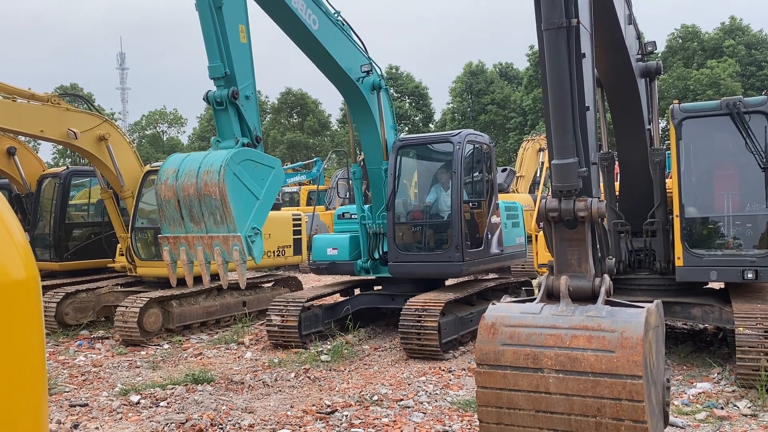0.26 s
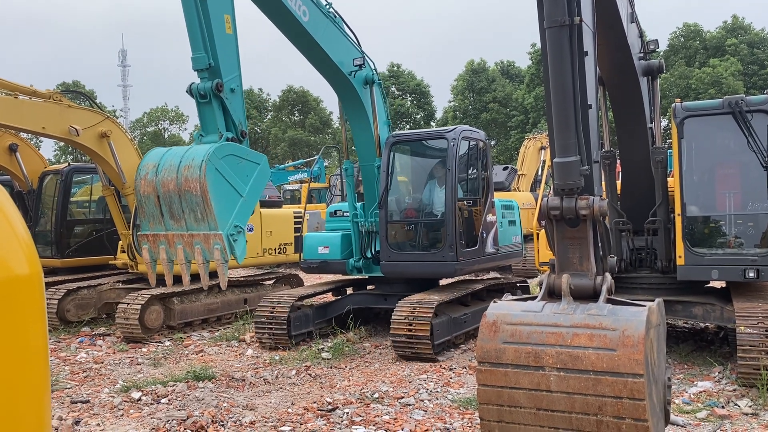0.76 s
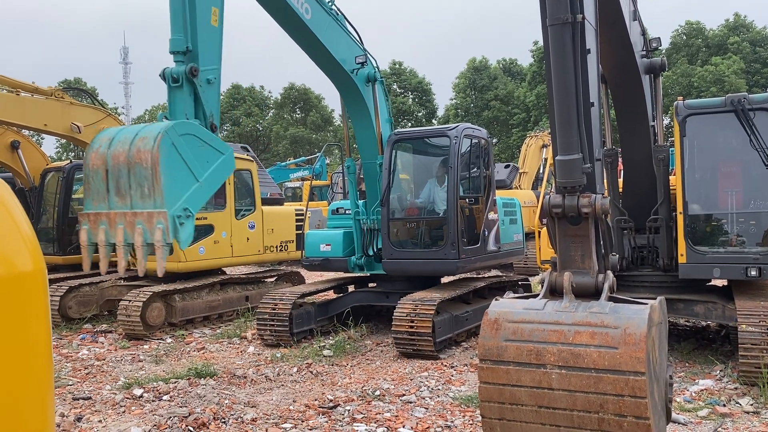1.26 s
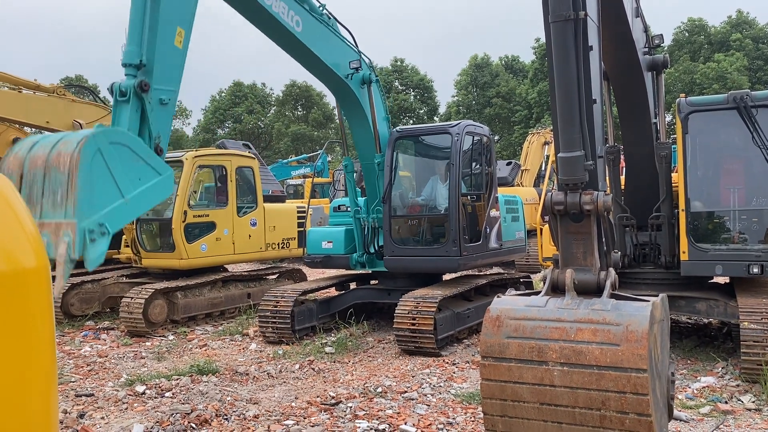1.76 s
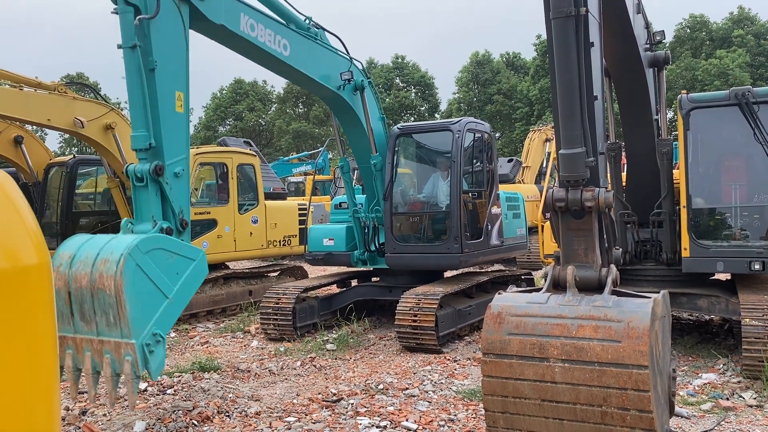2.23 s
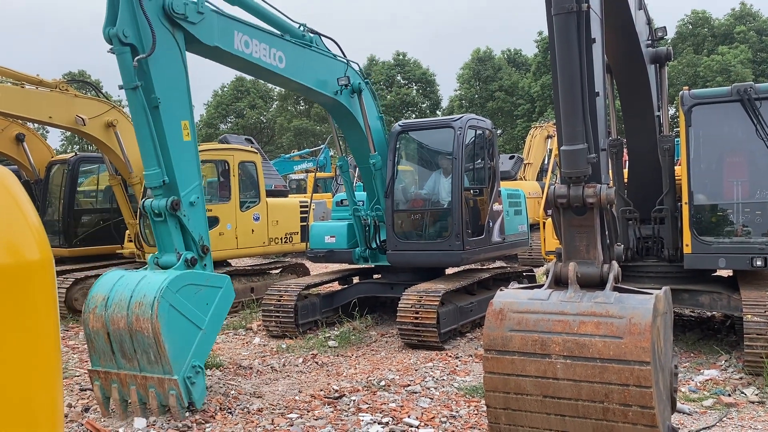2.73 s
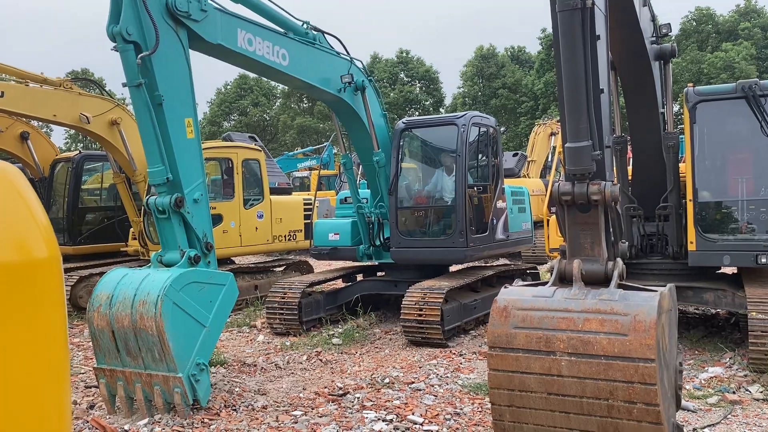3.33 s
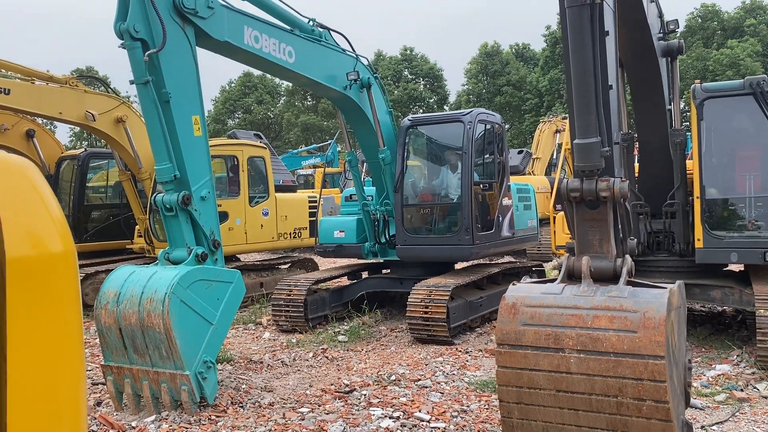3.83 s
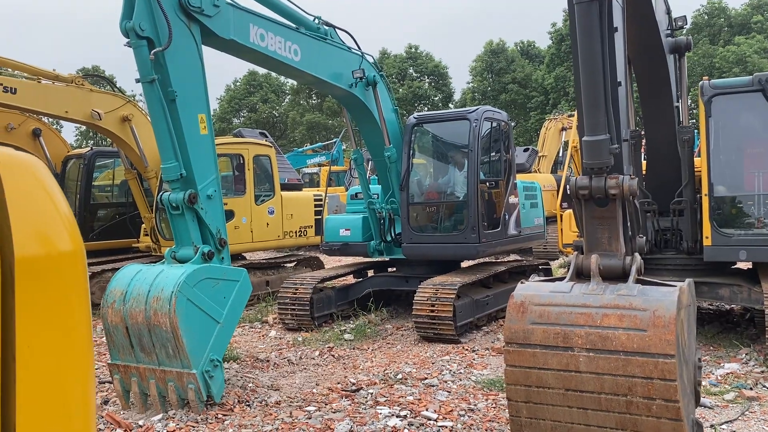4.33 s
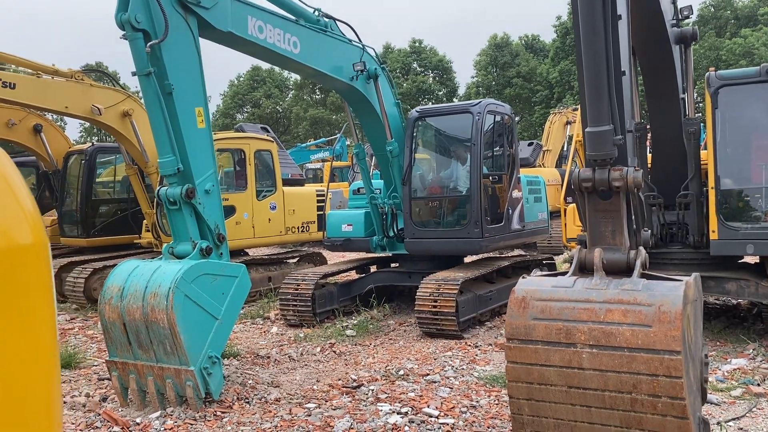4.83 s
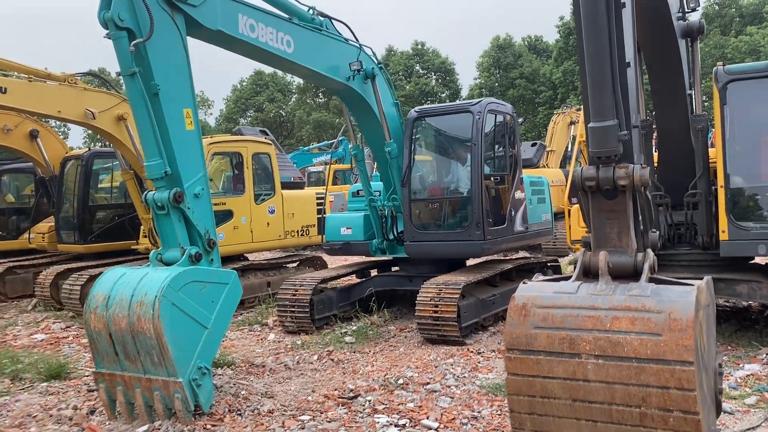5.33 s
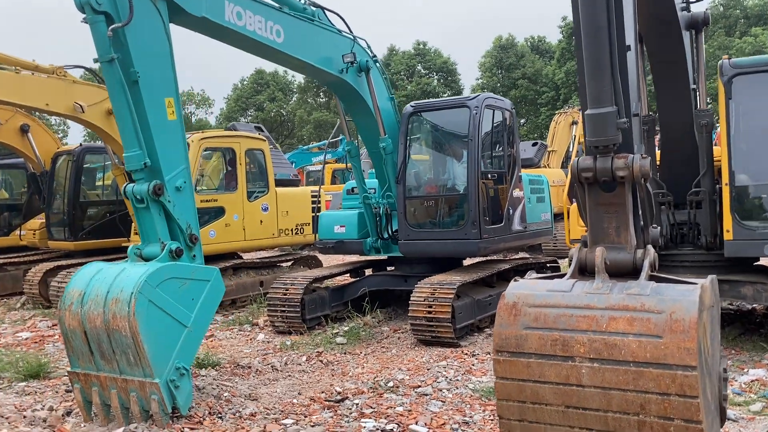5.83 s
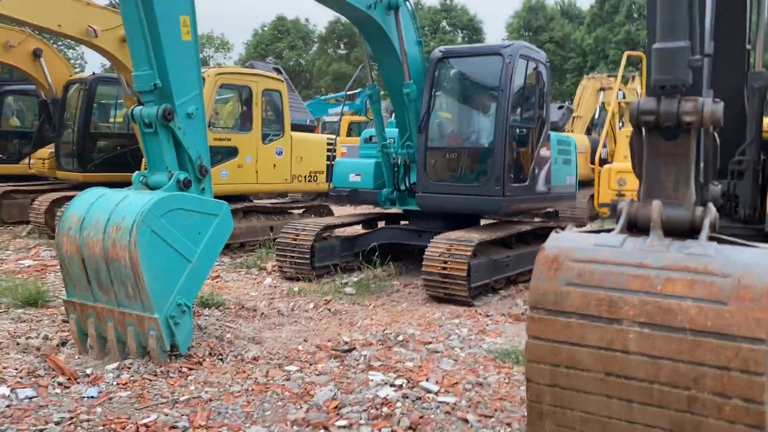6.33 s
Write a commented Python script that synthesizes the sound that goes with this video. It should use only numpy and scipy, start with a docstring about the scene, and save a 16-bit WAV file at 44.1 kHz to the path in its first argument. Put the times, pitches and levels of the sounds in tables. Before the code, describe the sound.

A steady, rough four-cylinder diesel roar fills an open yard. Heavy metallic bangs come in uneven clusters, densest around a second and a half, with short pin squeaks, clinks and brief echoes off parked machines. A sharp pebble crack sounds among the last blows. The engine then drones alone, winds down quickly, and thins to a quiet far wash with a handling tap near the end.

```python
"""An engine roars and sings over hard steel knocks in an open yard, then winds down.
It is a four-cylinder diesel excavator: exhaust, fan and pump are sines locked to the crank, the roar is pulsed noise.
The loose bucket knocks on its pins as the arm swings: bursts of bounces ring decaying modes, with clinks and echoes.
A pebble cracks, far machinery washes behind and a hand taps the camera body.
All is heard through two close microphone ports; near the end a low cut switches in."""
import sys
import numpy as np
from scipy import signal
from scipy.fft import rfft, irfft
from scipy.io import wavfile

SR = 44100
rng = np.random.default_rng(int(sys.argv[2]) if len(sys.argv) > 2 else 0)


def how_loud(loudness_db):
    """Turn decibels into a plain amplitude multiplier (0 dB gives 1, 20 dB gives 10)."""
    steps = np.asarray(loudness_db, float) / 20
    return 10 ** steps


def log_audio(samples):
    """Write samples as a 16-bit WAV file to the path given in sys.argv[1]."""
    # one column per channel
    frames = np.atleast_2d(samples).T
    # limit to full scale, then quantise
    limited = np.clip(frames, -1, 1)
    pcm = np.round(limited * 32767).astype(np.int16)
    wavfile.write(sys.argv[1], SR, pcm)


N = 290178
T = np.arange(N) / SR  # seconds


def evened(x):
    """Normalization: scales to a root mean square of 1."""
    return x / np.sqrt(np.mean(x ** 2) + 1e-20)


def read(points, hz):
    """Log-frequency interpolation of a table of (Hz, value)."""
    f, value = np.transpose(points)
    return np.interp(np.log(hz + 1), np.log(f + 1), value)


def curves(rows):
    """Linear interpolation in time of each column after the first, which holds seconds."""
    s, *columns = np.transpose(rows)
    return [np.interp(T, s, column) for column in columns]


def colour(x, points):
    """Linear filtering: multiplies the spectrum by a table of (Hz, dB)."""
    gain = how_loud(read(points, np.fft.rfftfreq(x.shape[-1], 1 / SR)))
    return irfft(rfft(x) * gain, x.shape[-1])


def resonate(x, hz, width):
    """Simple resonance: two poles with gain 1 at the peak."""
    return signal.lfilter(*signal.iirpeak(hz, hz / width, SR), x)


def wander(hz):
    """Slow random modulation of rms 1: sines of random phase from hz / 8 to hz."""
    f = np.geomspace(hz / 8, hz, num=24)
    coarse = T[::64]
    slow = np.sin(2 * np.pi * (f[:, None] * coarse + rng.random((len(f), 1)))).sum(0)
    return np.interp(T, coarse, evened(slow))


# Speed and exhaust of the engine. Each row: time in seconds, firing rate in Hz,
# exhaust beat at that rate in dB, its octave in dB.
ENGINE_COURSE = [(0.0, 66.5, -18, -40), (0.35, 65.1, -23, -36), (0.6, 67.25, -17, -42),
                 (1.05, 65.85, -16.5, -45), (1.2, 65.12, -23, -34), (1.6, 65.2, -24, -45),
                 (1.8, 66.5, -20, -43), (2.05, 63.63, -20.5, -32), (2.25, 63.5, -26.5, -32),
                 (2.55, 64.95, -25, -35), (2.7, 67.54, -17.5, -32), (3.0, 66.19, -17, -32.5),
                 (4.55, 66.93, -18.5, -34.5), (4.8, 62.3, -15.5, -35), (4.9, 58.7, -20.5, -31),
                 (5.1, 52.56, -29.5, -34.5), (5.25, 49, -28, -31.5), (5.36, 46.43, -32, -34),
                 (5.45, 44.27, -34, -26), (5.6, 40.6, -39, -25)]
# Broadband levels. Each row: time in seconds, engine roar in dB, oil hiss in valves and hoses in dB.
NOISE_COURSE = [(0.0, -31, -44.5), (0.53, -29.5, -42), (1.26, -31.5, -43), (1.55, -25.5, -41),
                (1.9, -27.5, -42.5), (2.11, -32, -35), (2.5, -31, -36), (2.88, -28, -41),
                (3.21, -32.5, -42.5), (4.53, -32, -43), (5.02, -35, -49.5), (5.5, -40, -49.5),
                (5.74, -47.5, -51), (6.01, -51.5, -52.5), (6.58, -45.5, -51.5)]
# Spectrum shape of the oil hiss. Each row: frequency in Hz, relative density in dB per Hz.
HISS_SPECTRUM = [(800, -31), (2200, 8.5), (4200, 0.5), (6000, -3.5), (8500, -5), (11000, -7), (14500, -9),
                 (15700, -13), (16300, -53)]


def engine():
    """Superposition: crank-locked tones, roar of the block and turbulent hiss of the oil."""
    speed_hz, beat_db, octave_db = curves(ENGINE_COURSE)
    turns = np.cumsum(speed_hz) / SR  # firings so far
    roar_db, hiss_db = curves(NOISE_COURSE)
    roar = block(turns)
    mid_band = signal.butter(4, (300, 1500), "band", fs=SR, output="sos")
    mids = signal.sosfilt(mid_band, roar.mean(0))  # the roar level refers to this band
    oil = rng.standard_normal((2, N)) * how_loud(0.5 * wander(24))
    hiss = evened(ports(*colour(oil, HISS_SPECTRUM)))
    fade = how_loud(-300 * np.maximum(T - 5.59, 0))  # the tones die at 300 dB a second
    hum = tones(turns, roar_db, speed_hz, beat_db, octave_db) * fade
    return ports(hum, None) + how_loud(roar_db) * roar / mids.std() + how_loud(hiss_db) * hiss


# Hydraulic pump. Each row: time in seconds, piston tone in dB, its octave in dB.
PUMP_COURSE = [(0, -45, -42), (2.0, -47, -54), (2.1, -30.5, -59), (2.45, -32, -33), (2.7, -54, -40),
               (4.6, -64, -37), (5.0, -58, -62)]
# Thin lines of crank and valve gear. Each row: cycles per firing, level against the roar setting in dB.
CRANK_LINES = [(2.196, -10.5), (2.99, -7), (1.725, -18), (2.526, -22), (5.507, -15.5), (7.05, -16),
               (8.88, -12), (9.54, -17), (10.2, -13), (11.27, -15), (11.59, -24), (12.68, -15.5),
               (13.02, -18), (20.61, -17)]
FAN_RATIO = 2.71  # blade passes per firing
FAN_DB, FAN_FULL_HZ = -27, 66.5  # blade tone at working speed, and that speed in firings per second
FAN_LOSS_DB = .035  # per square Hz of departure from working speed
FAN_WAVER_DB = 1.5  # rms


def tones(turns, roar_db, speed_hz, beat_db, octave_db):
    """Order tracking: exhaust, belt-driven fan and pump pistons sound at fixed multiples of the firing rate."""
    pump_db, pump_octave_db = curves(PUMP_COURSE)
    fan_db = FAN_DB - FAN_LOSS_DB * (speed_hz - FAN_FULL_HZ) ** 2
    # the fourth multiple meets a pipe resonance at 178 Hz while winding down
    pipe_db = -14 + 13 / (1 + ((4 * speed_hz - 178) / 25) ** 2)
    # each line: cycles per firing, level in dB, rms waver in dB
    lines = [(1, beat_db, .8), (2, octave_db, 3.5), (4, octave_db + pipe_db, 1.5),
             (FAN_RATIO, fan_db, FAN_WAVER_DB), (FAN_RATIO / 2, fan_db - 5.0, FAN_WAVER_DB),
             (4.5, pump_db, 1.2), (9, pump_octave_db, 2.5)]
    lines += [(ratio, roar_db + db, 1.8) for ratio, db in CRANK_LINES]
    total = np.zeros(N)
    for ratio, db, waver_db in lines:
        level = np.sqrt(2) * how_loud(db + waver_db * wander(20))
        total += level * np.sin(2 * np.pi * (ratio * turns + rng.random()))
    return total


# The cylinders in firing order. Each row: relative mean strength in dB.
CYLINDER_STRENGTH = [-5, -2.5, -7, -2]
# Panel resonances of the hood. Each row: frequency in Hz, width in Hz, relative level in dB.
HOOD_MODES = [(612, 12.7, 0), (766.5, 30, 0.5), (499, 17, -12), (1380, 150, -6.5)]
# Spectrum shape of the roar. Each row: frequency in Hz, relative density in dB per Hz.
ROAR_SPECTRUM = [(25, -40), (45, -14), (70, -1), (115, -10), (190, -2), (300, -8.5), (400, -15), (600, -13),
                 (950, -20.5), (2000, -25), (4200, -31), (7900, -41), (11000, -48), (16000, -63)]


def block(turns):
    """Periodic excitation: firings knock and puff noise; unequal cylinders give lines a quarter beat apart."""
    count = np.floor(turns).astype(int)
    luck_db = 1.7 * rng.standard_normal(count[-1] + 1)[count]  # one draw per firing
    size = how_loud(np.take(CYLINDER_STRENGTH, count % len(CYLINDER_STRENGTH)) + luck_db)
    blows = evened(size * (np.diff(count, prepend=0) > 0))
    puff = 1 + .2 * np.exp(-(turns % 1) / .4)
    gate = size ** .25 * puff * how_loud(.6 * wander(8))
    pair = []
    for _ in "LR":
        dry_roar = 0.19 * blows + evened(gate * rng.standard_normal(N))
        panels = sum(how_loud(db + 5) * resonate(dry_roar, hz, width) for hz, width, db in HOOD_MODES)
        pair.append(dry_roar + panels)
    return ports(*colour(np.array(pair), ROAR_SPECTRUM))


# Bucket knocks. Each row: start in seconds, level in dB, boom under 400 Hz in relative dB,
# edge over 2.5 kHz in relative dB, frequency in Hz of the plate that is lifted most.
KNOCK_EVENTS = [(0.262, -29, 0, -8, 1380), (0.382, -25.5, -1, -17, 2450), (0.471, -22, -23, -5, 1500),
                (0.59, -22.5, 11, -16, 931), (0.659, -23, 6, -4.5, 2130), (0.959, -15.5, -11, -13.5, 1210),
                (1.212, -23.5, -3.5, -28, 904), (1.319, -20, 3.5, -13, 1193), (1.445, -25.5, -9, -17, 1380),
                (1.535, -14, -0.5, -7.5, 1297), (1.576, -15, -15, -16, 1293), (1.604, -17.5, -2, -20, 950),
                (1.629, -15.5, 7, -11, 254), (1.712, -13.5, 1, -15, 700), (1.739, -17, 1, -7, 2876),
                (1.762, -16.5, 2, -9, 1360), (1.816, -11.5, -6, -10, 1060), (1.914, -23, -1, -3, 1210),
                (1.969, -28, 4, -15, 1129), (2.484, -17, -25, -9, 1900), (2.652, -17, 1, -8.5, 700),
                (2.689, -21, 10, -1, 254), (2.815, -15, -4, -6, 1489), (2.869, -18.5, 3.5, -13, 930),
                (2.914, -25, -4, -19, 948), (3.093, -17, -8.5, -9.5, 1367), (3.145, -18, -8.5, -11, 790),
                (3.191, -26, 1, -4, 1490), (4.527, -35.5, -3, 9, 1600), (6.323, -40.5, -9, -7, 977)]
# Modes of bucket and arm. Each row: frequency in Hz, relative level in dB, time to fall 60 dB in seconds.
BUCKET_MODES = [(106, -7.5, 0.16), (253, 3.5, 0.35), (297.4, -11.5, 0.28), (375, -13.5, 0.22),
                (494.5, -13.5, 0.63), (659, -7, 0.14), (722, 0, 0.076), (791.7, 7, 0.04),
                (873, -20.5, 0.11), (931, -6.5, 0.086), (1260, -4.5, 0.12), (1341, -3, 0.035),
                (1498, -12, 0.15), (1553, -19, 0.098), (1900, -11, 0.048), (2102, -10.5, 0.071),
                (2233, -12.5, 0.15), (2313, -20, 0.13), (2517, 3.5, 0.052), (2695, -3, 0.2),
                (2990, -25, .06), (3200, -23, .06), (3650, -3, .04)]
RATTLE_T60_S, BOUNCES_PER_S, CONTACT_S = 0.072, 220, .0015  # fall, mean rate, onset ramp
PLATE_DB, LUCK_DB = 12, 2.2  # lift of the struck plate's modes, chance spread of all modes


def knocks():
    """Modal synthesis: each blow chatters in the pin play and rings the modes, favouring the struck plate."""
    out, t = np.zeros(N + SR), T[:SR // 2]
    hz, level_db, ring_t60 = np.transpose(BUCKET_MODES)
    modes = how_loud(-60 * t / ring_t60[:, None]) * np.sin(2 * np.pi * hz[:, None] * t)
    for s, db, boom_db, edge_db, plate_hz in KNOCK_EVENTS:
        noise, luck = rng.standard_normal(len(t)), rng.random(len(t))
        fall = how_loud(-60 * t / RATTLE_T60_S)
        bounces = np.sign(noise) * (luck < BOUNCES_PER_S / SR)
        chatter = fall * (bounces + 1.65 * (t == 0))  # the first contact is strongest
        struck_db = PLATE_DB * np.exp(-(np.log(hz / plate_hz) / 0.064) ** 2)
        struck_db = struck_db + LUCK_DB * rng.standard_normal(len(hz))
        ring = how_loud(level_db + struck_db + boom_db * (hz < 400) + edge_db * (hz > 2500)) @ modes
        crunch = colour(noise * fall * np.minimum(t / 0.0066, 1),
                        [(150, -15), (300, boom_db), (800, -5.5), (2200, -8.0),
                         (3500, edge_db - 7.5), (9000, edge_db - 32)])
        blow = evened(signal.oaconvolve(chatter, ring)[:len(t)]) + 0.59 * evened(crunch)
        blow = blow / np.sqrt(np.mean(blow[:900] ** 2))  # level set by the first 20 ms
        at = round(s * SR)
        out[at:at + len(t)] += how_loud(db) * np.minimum(t / CONTACT_S, 1) * blow
    return out[:N]


# Pin clinks. Each row: start in seconds, level in dB, ring in Hz, time to fall 60 dB in seconds.
CLINK_EVENTS = [(.165, -23, 3750, 0.24), (.411, -24, 7330, .06), (.473, -28, 3180, .09),
                (.961, -23, 4190, 0.06), (1.628, -24, 4110, .05), (1.739, -13.5, 2990, 0.042),
                (2.453, -19.5, 4100, 0.078), (2.662, -27, 3200, .085), (2.888, -24, 5643, 0.1)]
# Pin scrapes. Each row: start in seconds, level of the rub in dB, length before the decay in seconds.
SCRAPE_EVENTS = [(0.148, -32.5, .04), (0.375, -32.5, 0.013), (0.414, -41, .014), (.961, -41.5, 0.026),
                 (1.819, -41, .026), (1.928, -47, .017), (2.453, -46, .01), (2.662, -48, .02),
                 (2.887, -38, .002)]
# Spectrum shape of the rub. Each row: frequency in Hz, relative level in dB.
SCRAPE_SPECTRUM = [(1800, -21), (2700, -2.5), (5500, -8), (7200, -3), (9000, -4.5), (11500, -3.5),
                   (16000, -20)]
# Pin modes excited by the rub. Each row: frequency in Hz, width in Hz, gain in dB.
PIN_MODES = [(2410, 98, 18), (2740, 51, 11), (4100, 110, 12.5), (5020, 290, 11.5), (6860, 530, 1.5),
             (8000, 480, -10)]


def clinks():
    """Impact and friction: struck pins ring at one high mode each, rubbed pins pass noise through resonances."""
    rings, scrapes, t = np.zeros(N), np.zeros(N), T[:SR // 2]
    for s, db, hz, t60 in CLINK_EVENTS:
        at = round(s * SR)
        envelope = how_loud(db - 60 * t / t60) * np.minimum(t / 0.00039, 1)
        rings[at:at + len(t)] += envelope * np.sin(2 * np.pi * hz * t)
    for s, db, length in SCRAPE_EVENTS:
        at = round(s * SR)
        held = how_loud(db - 60 * np.maximum(t - length, 0) / 0.13)
        scrapes[at:at + len(t)] += held * np.minimum(t / 0.0003, 1)
    rub = scrapes * evened(colour(rng.standard_normal(N), SCRAPE_SPECTRUM))
    return rings + rub + sum(how_loud(db) * resonate(rub, hz, width) for hz, width, db in PIN_MODES)


def echoes(x):
    """Sparse reflection: parked machines return taps of random sign, the high treble dying first."""
    t = T[:SR // 2]
    shape = (2, len(t))
    signs = rng.choice([-1., 1.], shape)
    taps = signs * (rng.random(shape) < .05) * (t > .008)
    hz, frame_s, z = signal.stft(taps, SR, nperseg=256)
    t60 = read([(250, 0.23), (1000, 0.33), (6000, 0.082)], hz)
    tail = signal.istft(z * how_loud(-60 * frame_s / t60[:, None]), SR, nperseg=256)[1]
    return signal.oaconvolve(x[None], tail / np.linalg.norm(tail[0]), axes=1)[:, :N]


# Spectrum shape of a pebble's crack on steel. Each row: frequency in Hz, relative level in dB.
SNAP_SPECTRUM = [(3000, -27), (4800, 11), (6000, 17), (8000, -35), (11500, 7.5), (16000, -22)]
SNAP_S, SNAP_DB, SNAP_DECAY_S = 2.886, -8, .001  # start, peak level, decay of the burst to 1/e


def snap():
    """Impulsive excitation: a pebble cracks on steel, one brief decaying burst of coloured noise."""
    since = T - SNAP_S
    burst = rng.standard_normal(N) * (since > 0) * np.exp(-np.maximum(since, 0) / SNAP_DECAY_S)
    crack = colour(burst, SNAP_SPECTRUM)
    return how_loud(SNAP_DB) * crack / abs(crack).max()


# Taps of the hand on the camera body. Each row: time in seconds, peak in dB averaged over the two ports.
BODY_TAPS = [(6.4174, -31), (6.4207, -16)]


def bump():
    """Structure-borne sound: two quick round pulses through the camera body, stronger on the right."""
    pulses = sum(how_loud(db) * np.exp(-.5 * ((T - s) / 0.00033) ** 2) for s, db in BODY_TAPS)
    return pulses * how_loud([[-2.5], [2.5]])


# Spectrum shape of far machinery. Each row: frequency in Hz, relative density in dB per Hz.
YARD_SPECTRUM = [(100, -30), (250, -17), (760, 9.5), (1000, -2), (1300, 3), (3300, -8.5), (4200, 0.5),
                 (5700, -11.5), (9000, -18.5), (16000, -33)]
YARD_DB = -47  # mean level


def yard():
    """Diffuse field: far machinery blends into a smooth noise wash with a slow swell."""
    wash = ports(*colour(rng.standard_normal((2, N)), YARD_SPECTRUM))
    return how_loud(YARD_DB + 0.84 * wander(5)) * evened(wash)


# Phase between the ports. Each row: frequency in Hz, phase in radians.
PORT_PHASE = [(60, 0.28), (200, .41), (380, 0.7), (700, 1.01), (1300, 1.3), (2400, 1.25), (4400, 1.05),
              (5500, 1.63), (6300, 1.15), (7000, 0)]
# Coherence of the ports' difference. Each row: frequency in Hz, share in step with the sum from -1 to 1.
PORT_COHERENCE = [(60, -.95), (350, -.8), (550, .7), (1000, .55), (3000, .4), (4000, 0), (5300, -.3),
                  (6500, 0), (7200, .75)]
# Balance of the ports. Each row: frequency in Hz, left over right in dB.
PORT_BALANCE = [(60, 0), (110, 0.0), (200, 0.68), (380, -1), (700, -3), (1290, 0.1), (2380, 1), (4400, 2.5),
                (8120, -1), (15000, 1.8)]
# Comb of the ports. A single row: lower edge in Hz, upper edge in Hz, spacing of half-cycle turns in Hz.
PORT_COMB = (7000, 15000, 2000)


def ports(x, diffuse, aside=0.):
    """Interaural-style phase and coherence: two close ports as a sum and a partly unrelated difference."""
    hz = np.fft.rfftfreq(N, 1 / SR)
    low_hz, high_hz, turn_hz = PORT_COMB
    across = aside * np.exp(-np.log(hz / 1800 + 1e-9) ** 2)  # a source off to one side: more phase in the mids
    lead = read(PORT_PHASE, hz) + across - np.pi * (np.clip(hz, low_hz, high_hz) - low_hz) / turn_hz
    alike = np.clip(read(PORT_COHERENCE, hz), -1, 1)
    tilt = how_loud(read(PORT_BALANCE, hz) / 2)
    spectrum = rfft(x)
    mid = np.cos(lead / 2) * spectrum
    if diffuse is None:
        apart = np.sign(alike) * spectrum
    else:
        apart = alike * spectrum + np.sqrt(1 - alike ** 2) * rfft(diffuse)
    side = 1j * np.sin(lead / 2) * apart
    return irfft(np.array([(mid + side) * tilt, (mid - side) / tilt]), N)


def scene():
    """Superposition: engine, steel with its echoes, pebble, yard and hand."""
    steel = knocks() + clinks()
    far = how_loud(-5.0) * echoes(steel)
    # ground and camera body scatter the direct sound
    scatter = rng.standard_normal(600) * np.exp(-np.arange(600) / 150)
    near = signal.oaconvolve(steel, scatter / np.linalg.norm(scatter))[:N]
    bucket = ports(steel + far[0], near + far[1], aside=0.3)
    return engine() + bucket + ports(snap(), None) + yard() + bump()


def roll_off(x):
    """The treble ends steeply here."""
    return signal.sosfilt(signal.butter(12, 16860, fs=SR, output="sos"), x)


# Full-band sound that still passes beside the low cut. Each row: time in seconds, share in dB.
LOW_CUT_LEAK = [(5.6, -20), (5.7, -20), (5.76, -48), (6.28, -40), (6.4, -10), (6.58, -18)]
LOW_CUT_S, LOW_CUT_HZ = 5.585, 250


def record(dry):
    """High-pass crossfade and saturation: the low cut fades in quickly and peaks round off softly."""
    high_pass = signal.butter(3, LOW_CUT_HZ, "high", fs=SR, output="sos")
    cut = signal.sosfiltfilt(high_pass, dry)
    full = np.maximum(np.exp(-np.maximum(T - LOW_CUT_S, 0) / 0.0091), how_loud(*curves(LOW_CUT_LEAK)))
    heard = full * dry + (1 - full) * cut
    mix = 1.18 * np.tanh(heard / 1.238)
    return roll_off(mix)


dry = scene()
out = record(dry)
log_audio(out)
```